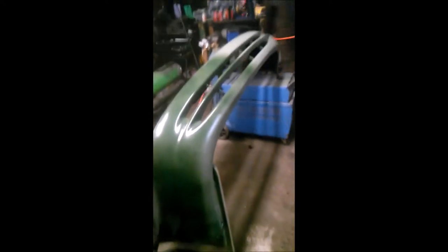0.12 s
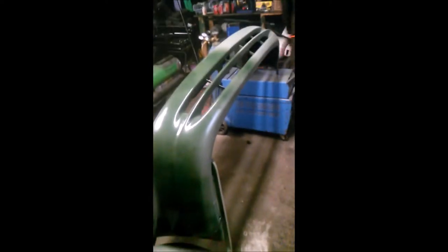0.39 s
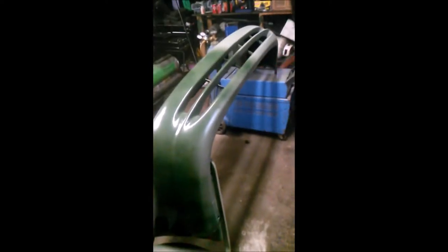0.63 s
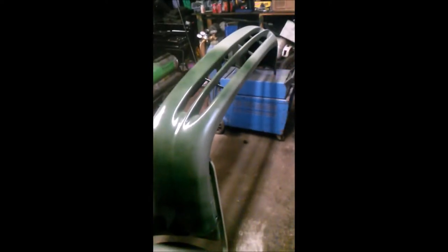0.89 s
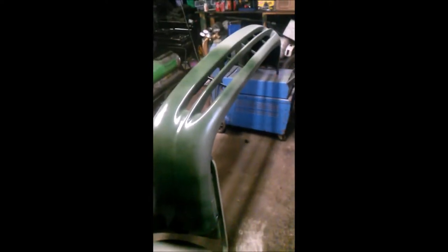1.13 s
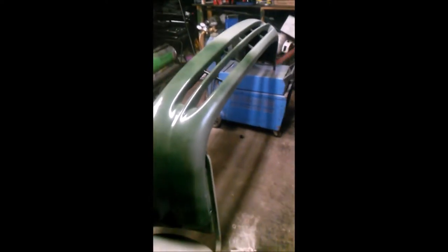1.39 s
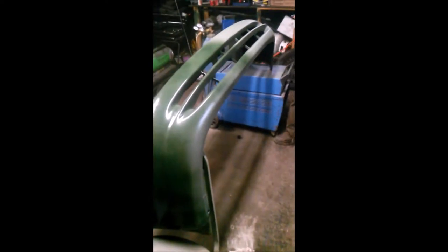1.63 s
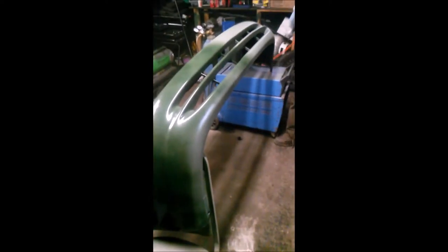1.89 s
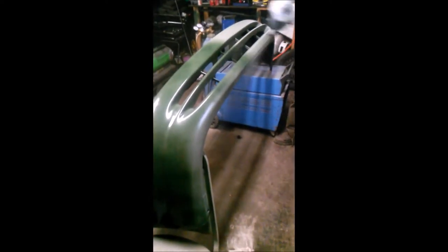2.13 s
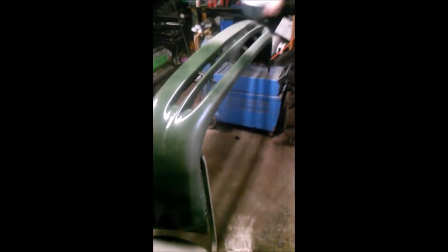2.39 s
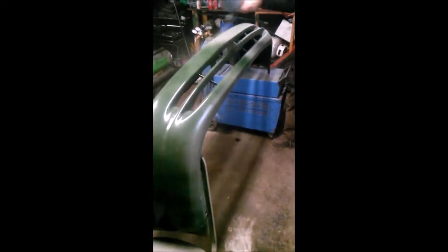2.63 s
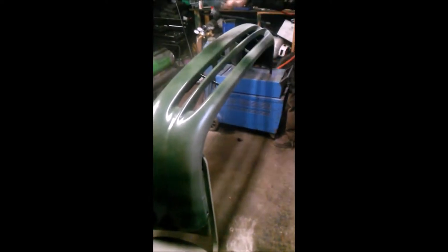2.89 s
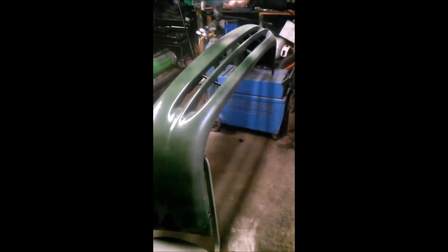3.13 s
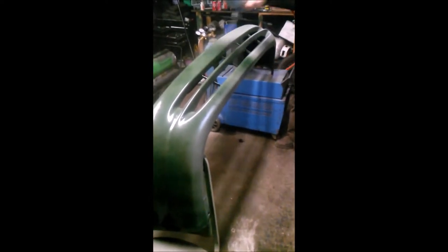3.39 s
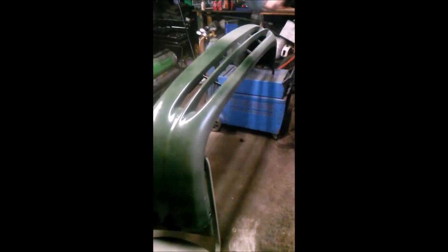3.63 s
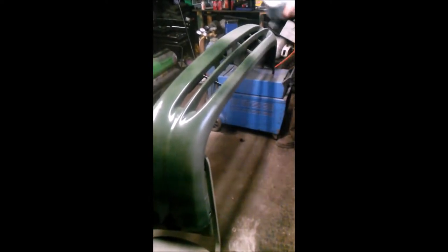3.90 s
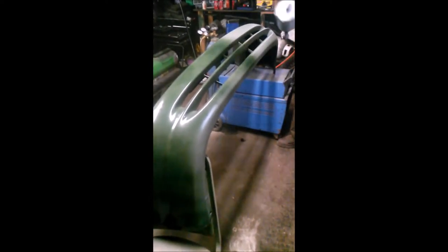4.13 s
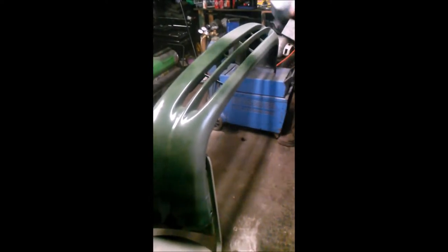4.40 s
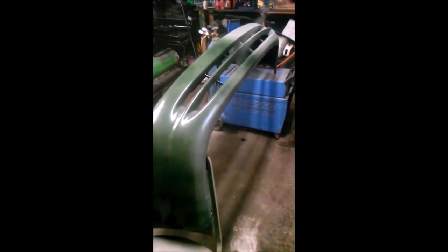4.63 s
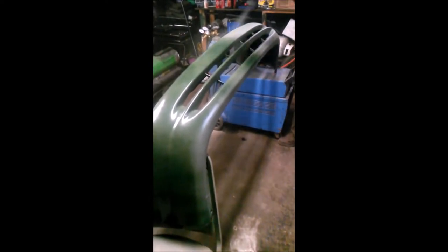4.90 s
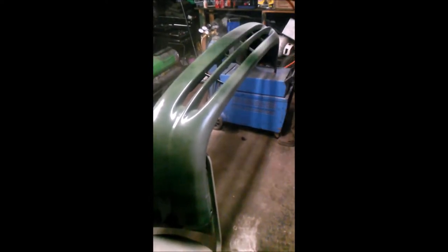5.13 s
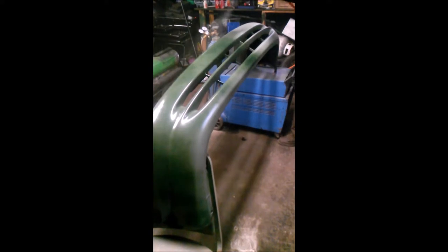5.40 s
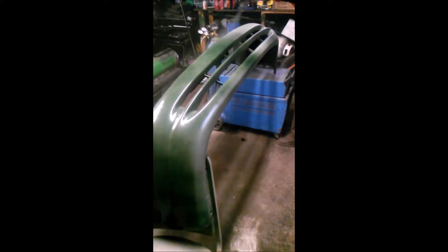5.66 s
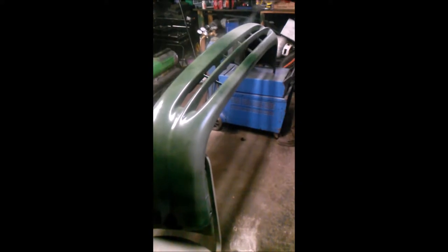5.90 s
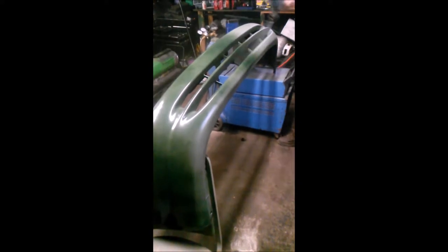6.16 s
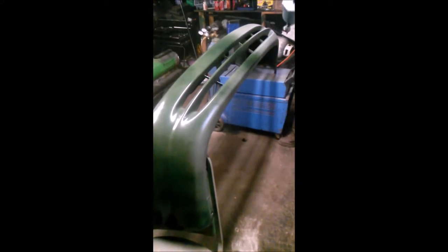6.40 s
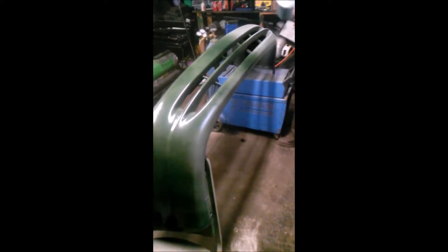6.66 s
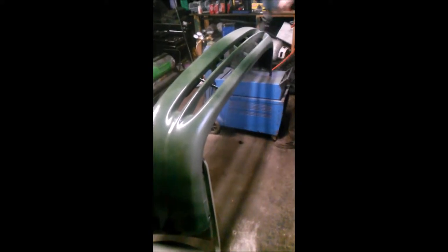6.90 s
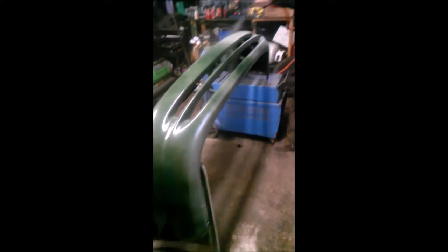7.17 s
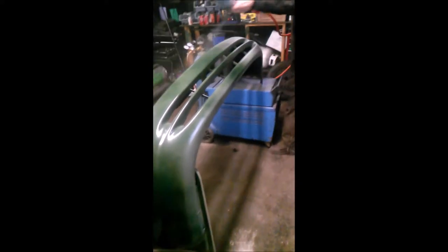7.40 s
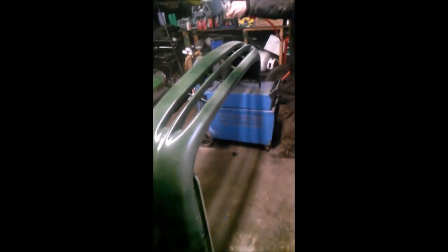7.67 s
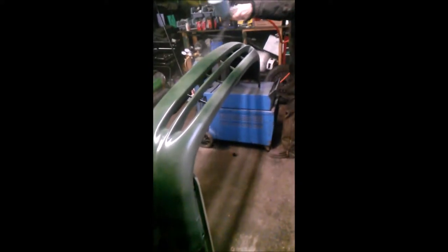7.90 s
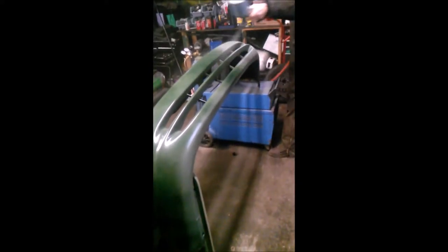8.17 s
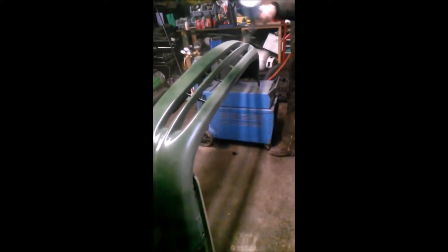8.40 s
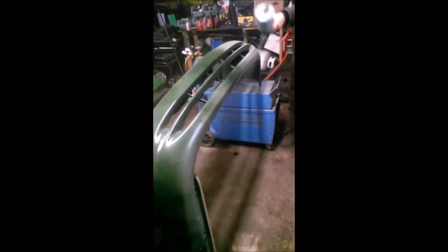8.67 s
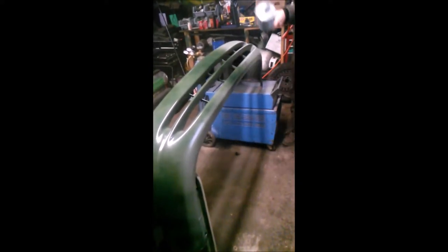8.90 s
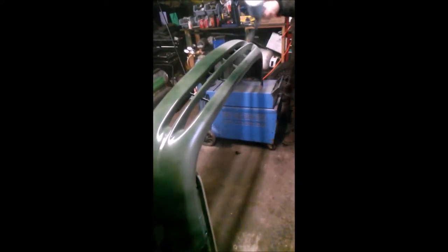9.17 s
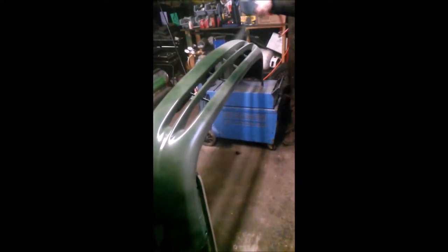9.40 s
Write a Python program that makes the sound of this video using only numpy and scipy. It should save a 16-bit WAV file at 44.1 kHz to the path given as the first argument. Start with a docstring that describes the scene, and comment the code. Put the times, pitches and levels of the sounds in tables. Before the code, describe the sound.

In a home garage, a faint bright seep of air stops after a second while shoes scuff concrete and something knocks dully over low rumble. Then a paint spray gun bursts into loud, harsh hiss, in steady passes of about a second, separated by very short gaps with a low valve thump. Close, small mono microphone, piercing in the treble, overloaded at peaks.

```python
"""Air seeps from a paint gun in a home garage while shoes scuff, something knocks and faint whistles arch.
Then the air-powered gun sprays in steady passes close to a small mono microphone.
Air and scuffs are noise shaped in bands; knocks and the thump of each trigger release are ringing modes.
The microphone port rings near 11 kHz, gain control sinks the room rumble under the jet, and peaks overload.
Now and then the sound thins out briefly."""
import sys
import numpy as np
from scipy import signal
from scipy.fft import rfft, irfft
from scipy.io import wavfile
from scipy.ndimage import uniform_filter1d

SR = 44100
rng = np.random.default_rng(int(sys.argv[2]) if len(sys.argv) > 2 else 0)


def transcribe(signal):
    """Save signal, clipped to [-1, 1], as a 16-bit WAV file at the path in sys.argv[1]."""
    frames = np.atleast_2d(signal).T
    limited = np.clip(frames, -1, 1)
    pcm = np.round(limited * 32767).astype(np.int16)
    wavfile.write(sys.argv[1], SR, pcm)


def boost(x):
    """Linear amplitude factor 10**(x/20) for a level x in decibels (scalar or array-like)."""
    u = np.asarray(x, float) / 20
    return 10 ** u


N = 420713

# All levels are those of the sources, ahead of the microphone's ringing and gain control.
# air seeping past the valve: start t/s, end t/s, level/dB
SEEPS = [(0, 0.973, -42.5), (1.18, 1.19, -53)]
# colour of the seeping air: f/Hz, relative level/dB per Hz
SEEP_COLOUR = [(3000, -17.5), (7000, 5), (8600, -24), (9700, 5), (10500, 2), (11500, -7), (13000, -12),
               (15500, 4.5)]
# colour of the room's own sound: f/Hz, relative level/dB per Hz
ROOM_COLOUR = [(25, 4.5), (36, 3.5), (60, -7.5), (92, -9.5), (170, -13.5), (260, -12), (500, -20),
               (1200, -26.5), (2500, -30), (5000, -39), (8000, -46), (12000, -46.5), (15500, -48)]
# low rumble swells as someone moves about: t/s, peak level/dB
RUMBLES = [(.02, -42), (.2, -37), (.48, -38), (.82, -43), (1.09, -32), (1.3, -42), (1.59, -38), (1.76, -39)]
# shoes on concrete, each scuff swelling and fading: peak t/s, peak level/dB, rough length/s
SCUFFS = [(0.214, -42, 0.19), (0.323, -49, 0.1), (0.466, -40, 0.18), (0.703, -57, 0.12), (.83, -61, .1),
          (.96, -49, 0.15), (1.24, -46.5, 0.11), (1.608, -43, 0.079)]
# colour of the scuffs: f/Hz, relative level/dB per Hz
SCUFF_COLOUR = [(300, 13), (1000, 6), (2500, 11.5), (4000, 3), (6500, 1), (10000, -21), (15000, 2)]
# dull knocks: t/s, nominal level/dB
KNOCKS = [(0.08, -36), (.2, -33.5), (0.806, -34), (1.017, -36), (1.569, -21.5)]
# ringing modes of the knocked thing: f/Hz, relative level/dB, time to fall by 60 dB/s
KNOCK_MODES = [(103, -24, 0.25), (144.4, 4.5, 0.32), (189, 6, 0.26), (258, 5, 0.26), (313, -2, 0.51),
               (374, -4, 0.24), (440, -11, 0.26), (730, -15, .1), (1250, -9, .08)]
# faint whistles that arch up and back down: start t/s, end t/s, lowest f/Hz, level/dB
WHISTLES = [(0.187, 0.313, 1430, -49.5), (0.194, .27, 2130, -48), (0.417, .62, 1117, -53),
            (.44, .58, 2534, -53), (.77, 1.22, 1864, -55)]
# trigger pulled: t/s, nominal settled jet level/dB, level change as the gun swings along the part/dB per s
PULLS = [(1.865, -18.5, -.5), (3.08, -19, 0), (4.23, -18.5, -0.5), (5.347, -19, 0), (6.581, -18, -1.5),
         (7.671, -19, 0), (8.874, -18, -3.5)]
# trigger let go, the valve seats with a thump: t/s, nominal thump level/dB
RELEASES = [(2.92, -24), (4.096, -21.5), (5.175, -22), (6.401, -24.5), (7.528, -23.5), (8.715, -22)]
# colour of the jet before its tilt: f/Hz, relative level/dB per Hz
JET_COLOUR = [(150, -39), (350, -17.5), (490, -5), (650, -9.5), (1000, -5.5), (1700, -6), (2600, 2.5),
              (4000, -1.5), (6300, 1), (8000, -2.5), (10000, -1), (12000, -1.5), (13500, 2), (16000, 1)]
# ringing modes of the gun: f/Hz, relative level/dB, time to fall by 60 dB/s
GUN_MODES = [(70, -1, 0.22), (133, -2.5, 0.22), (210, -0.5, 0.11), (254, 3, 0.097), (324, -2, .1),
             (395, -0.5, 0.245), (473, -10, 0.36)]
# the sound thins out briefly to the port band and a few stray tones: centre t/s, number of frames
THINNINGS = [(.135, 1), (.242, 1), (.284, 1), (.35, 1), (.39, 1), (.541, 1), (.731, 1), (.881, 1),
             (1.052, 1), (1.223, 1), (1.991, 1), (2.312, 1), (2.879, 2), (3.355, 3), (3.933, 1), (4.508, 1),
             (4.573, 1), (4.808, 1), (4.956, 1), (5.318, 1), (5.467, 3), (5.554, 1), (5.811, 1), (6.365, 1),
             (6.452, 1), (6.664, 1), (6.876, 1), (6.962, 1), (7.015, 2), (7.219, 1), (7.464, 2), (7.705, 1),
             (7.779, 3), (7.857, 1), (7.901, 1), (8.114, 1), (8.242, 1), (8.478, 1), (8.755, 1), (8.941, 2),
             (9.009, 1), (9.137, 1), (9.179, 1), (9.33, 1)]

SEEP_DIES_DB_PER_S = 138
SEEP_EDGE_HZ, SEEP_BELOW_EDGE_DB = 9000, -4.5   # the leak sets in steeply above this edge
ROOM_TONE_DB = -38
RUMBLE_DB, RUMBLE_WAVERS_DB, RUMBLE_SWELL_S = -45, 1, 0.075
JOLT_DB, JOLT_AFTER_S = -52, 0.092   # the rumble also swells after each release of the trigger
SHUFFLE_DB = -56   # faint shuffling until the first pass
WHISTLE_EDGE_S, WHISTLE_ARCH_PER_S = 0.03, 0.09   # arch: share of pitch gained per second of length
VALVE_OPENS_S, VALVE_SHUTS_S = 0.0083, 0.014   # time constant of each of two smoothings
# stored pressure makes each pass start louder and brighter, then settle
SURGE_DB, SURGE_S = 1, 0.2
SURGE_TILT_DB_PER_OCT, SETTLED_TILT_DB_PER_OCT = 1.03, 1.04
TREBLE_T60_S, MIDDLE_T60_S, WALL_CUT_HZ = 0.18, 0.34, 2700   # echoes above and below the cut
ECHO_DB, STEP_S = -6.5, 0.15
PORT_HZ, PORT_WIDTH_HZ, PORT_DB = 11168, 884, 19   # level of the ringing added to the plain sound
CUTOFF_HZ = 15750
BRIEF_LEAVES_DB, LONG_LEAVES_DB = -14.5, -24   # what one frame, or a run of them, leaves of the rest
SLOW = 40   # samples between slowly changing values


def at_hz(points, hz):
    """Read a table on a log-frequency axis."""
    table_hz, values = np.array(points).T
    return np.interp(np.log(hz), np.log(table_hz), values)


def rms_one(x):
    """Scale to unit rms, the usual measure of average strength."""
    return x / np.sqrt(np.mean(x ** 2) + 1e-20)


def lag(x, seconds):
    """One-pole smoothing: the output chases the input with the given time constant."""
    r = np.exp(-1 / (max(seconds, 1e-4) * SR))
    return signal.lfilter([1 - r], [1, -r], x + 1e-18)


def drift(rate_hz):
    """Slow chance of rms 1: white noise through two equal one-pole smoothings."""
    r = np.exp(-2 * np.pi * rate_hz * SLOW / SR)
    white = rng.standard_normal(N // SLOW + 2002)
    return rms_one(signal.lfilter([1], [1, -2 * r, r * r], white)[2000:])   # skip the filter's start


def stretched(slow):
    """Fill in the samples between slow values with straight lines."""
    return np.interp(np.arange(N) / SLOW, np.arange(len(slow)), slow)


def swells(rows):
    """Bell-shaped gains from rows of (t/s, peak level/dB, spread/s), added in power."""
    t = np.arange(N // SLOW + 2) * SLOW / SR
    power = sum(boost(2 * db) * np.exp(-((t - s) / spread) ** 2) for s, db, spread in rows)
    return stretched(np.sqrt(power))


def bands(spectrum, patchy_db, low_hz=22):
    """Third-octave bands of noise with their own level and flicker: yields centre and band."""
    edges = 18000 * 2 ** (np.arange(-30, 1) / 3)
    edges = edges[edges > low_hz]
    centres = np.sqrt(edges[1:] * edges[:-1])
    power = boost(2 * at_hz(spectrum, centres)) * np.diff(edges)
    total = np.sqrt(np.sum(power) * 2 / SR)
    white = rng.standard_normal((2, N))   # neighbouring bands take turns, so they differ
    together = drift(3.6)
    for k, hz in enumerate(centres):
        sos = signal.butter(2, edges[k:k + 2], "band", fs=SR, output="sos")
        band = signal.sosfilt(sos, white[k % 2])
        flicker_db = patchy_db * (0.26 * together + drift(7.3))
        yield hz, band * stretched(boost(at_hz(spectrum, hz) + flicker_db)) / total


def struck(hits, modes, spread_db):
    """Each blow sets every mode ringing with a strength of its own."""
    at = [round(s * SR) for s, db in hits]
    hit_db = np.array(hits)[:, 1]
    out = np.zeros(N)
    chance = rng.standard_normal((len(hits), len(modes)))
    for k, (hz, level_db, t60) in enumerate(modes):
        clicks = np.full(N, 1e-18)
        clicks[at] = boost(hit_db + level_db - 11 + spread_db * chance[:, k])
        r, w = boost(-60 / (t60 * SR)), 2 * np.pi * hz / SR
        out += signal.lfilter([0, np.sin(w)], [1, -2 * r * np.cos(w), r * r], clicks)
    return out


def seep():
    """A thin bright leak of air that holds, then dies away."""
    t = np.arange(N) / SR
    leak = np.zeros(N)
    for start, end, db in SEEPS:
        leak += (t >= start) * boost(db - SEEP_DIES_DB_PER_S * np.clip(t - end, 0, 1))
    hiss = sum(band for hz, band in bands(SEEP_COLOUR, patchy_db=0.6, low_hz=2000))
    duller = signal.sosfiltfilt(signal.butter(8, SEEP_EDGE_HZ, fs=SR, output="sos"), hiss)
    return leak * (hiss - duller + boost(SEEP_BELOW_EDGE_DB) * duller)


def room_tone():
    """Steady garage air as banded noise; the lowest bands swell on their own."""
    moves = RUMBLES + [(s + JOLT_AFTER_S, JOLT_DB) for s, db in RELEASES]
    rumble = boost(RUMBLE_DB + RUMBLE_WAVERS_DB * stretched(drift(3.4)))
    rumble = rumble + swells([(s, db, RUMBLE_SWELL_S) for s, db in moves])
    out = np.zeros(N)
    for hz, band in bands(ROOM_COLOUR, patchy_db=1.5):
        out += band * (rumble if hz < 65 else boost(ROOM_TONE_DB))
    return out


def scuffs():
    """Soles drag grit over the floor: noise that swells and fades with each scuff."""
    drag = swells([(s, db, length / 4) for s, db, length in SCUFFS])
    before_first_pass = np.arange(N) < PULLS[0][0] * SR
    drag = drag + boost(SHUFFLE_DB) * before_first_pass
    return drag * sum(band for hz, band in bands(SCUFF_COLOUR, patchy_db=0.8, low_hz=400))


def knocks():
    """A low wooden ring and, with it, a short rattle of mid-range noise."""
    burst = np.zeros(N)
    for s, db in KNOCKS:
        burst[round(s * SR)] = boost(db - 19)
    rattle = signal.lfilter([1], [1, -boost(-60 / (0.33 * SR))], burst + 1e-18)   # falls 60 dB in 0.33 s
    sos = signal.butter(1, [1800, 6000], "band", fs=SR, output="sos")
    grit = signal.sosfilt(sos, rng.standard_normal(N))
    return struck(KNOCKS, KNOCK_MODES, spread_db=2.5) + rattle * rms_one(grit)


def whistle():
    """Faint sine tones whose pitch arches while level and pitch waver by chance."""
    t, out = np.arange(N) / SR, np.zeros(N)
    flutter_db, waver_hz = 2.1 * stretched(drift(16)), 12 * stretched(drift(36))
    for start, end, low_hz, db in WHISTLES:
        length = end - start
        arch = np.sin(np.pi * np.clip((t - start) / length, 0, 1))
        hz = low_hz * (1 + WHISTLE_ARCH_PER_S * length * arch)
        edge = np.clip(np.minimum(t - start, end - t) / WHISTLE_EDGE_S, 0, 1)
        phase = 2 * np.pi * np.cumsum(hz + waver_hz) / SR
        out += edge * boost(db + flutter_db) * np.sin(phase)
    return out


def garage(x):
    """The gun moves, so every stretch of sound meets another pattern of reflections."""
    hop, t = round(STEP_S * SR), np.arange(round(0.3 * SR)) / SR
    fade = np.sin(np.pi * np.arange(2 * hop) / (2 * hop)) ** 2
    out = np.zeros(N + 4 * hop + len(t))
    padded = np.pad(x, (hop, 2 * hop))
    low = signal.butter(1, WALL_CUT_HZ, fs=SR, output="sos")
    for i in range(0, N + hop, hop):
        white = rng.standard_normal(len(t))
        dull = signal.sosfilt(low, white)
        echoes = (white - dull) * boost(-60 * t / TREBLE_T60_S) + dull * boost(-60 * t / MIDDLE_T60_S)
        echoes = boost(ECHO_DB) * rms_one(echoes * (t > 0.003)) / np.sqrt(len(t))
        echoes[0] = 1   # the direct sound
        heard = signal.fftconvolve(padded[i:i + 2 * hop] * fade, echoes)
        out[i:i + len(heard)] += heard
    return out[hop:hop + N]


def jet():
    """Turbulent air as banded noise: the flow builds fast and closes slower."""
    opened, since_pull = np.zeros(N), np.zeros(N)
    ends = [s + 0.0017 for s, db in RELEASES] + [N / SR]
    for (start, jet_db, change_db), end in zip(PULLS, ends):
        first = round(start * SR)
        since_pull[first:] = np.arange(N - first) / SR
        held = slice(first, round(end * SR))
        opened[held] = boost(jet_db + change_db * since_pull[held])
    opening = lag(lag(opened, VALVE_OPENS_S), VALVE_OPENS_S)
    closing = lag(lag(opened, VALVE_SHUTS_S), VALVE_SHUTS_S) * (opened == 0)
    flow = np.maximum(opening, closing)
    surge = np.exp(-since_pull / SURGE_S)
    tilt_db = SETTLED_TILT_DB_PER_OCT + SURGE_TILT_DB_PER_OCT * surge
    noise = np.zeros(N)
    for hz, band in bands(JET_COLOUR, patchy_db=0.7, low_hz=100):
        noise += band * boost(tilt_db * np.log2(hz / 11000))   # the tilt pivots at 11 kHz
    return garage(flow * boost(SURGE_DB * surge) * noise)


def thumps():
    """The valve seats just after each release and sets the gun's body ringing."""
    return struck([(s + 0.004, db) for s, db in RELEASES], GUN_MODES, spread_db=2)


def scene():
    """All sources reach one microphone; both channels are the same."""
    mono = seep() + room_tone() + scuffs() + knocks() + whistle() + jet() + thumps()
    return np.array([mono, mono])


def port_resonance(x):
    """Air in the microphone port resonates, adding a narrow ringing band to the sound."""
    r, w = np.exp(-np.pi * PORT_WIDTH_HZ / SR), 2 * np.pi * PORT_HZ / SR
    ringing = signal.lfilter(np.array([1, 0, -1]) * (1 - r * r) / 2, [1, -2 * r * np.cos(w), r * r], x)
    return x + boost(PORT_DB) * ringing


def gain_control(x):
    """Turns everything down as the smoothed loudness rises past a threshold."""
    level_db = 10 * np.log10(lag(x ** 2, 0.0099) + 1e-12)
    over_db = np.maximum(level_db + 21.5, 0)
    return x * boost(6 - 0.3 * over_db)


def thinned(x, stray=2.6, easier_per_khz=0.08, kept_db=-9, lift_db=4):
    """In short overlapping frames, weaken all but the loudest region and lift outstanding partials."""
    hop = round(0.0213 * SR)
    fade = np.sin(np.pi * np.arange(2 * hop) / (2 * hop))
    khz = np.fft.rfftfreq(2 * hop, 1000 / SR)
    out = x.copy()
    for s, frames in THINNINGS:
        left_db = LONG_LEAVES_DB if frames > 1 else BRIEF_LEAVES_DB
        first = round(s * SR) - hop * (frames + 1) // 2
        for i in first + hop * np.arange(frames):
            partials = rfft(x[i:i + 2 * hop] * fade)
            local = np.sqrt(uniform_filter1d(abs(partials) ** 2, size=25))
            quiet = local < boost(kept_db) * local[khz > 7].max()
            outstanding = abs(partials) > (stray - easier_per_khz * khz) * local   # easier in the treble
            near_one = uniform_filter1d(1.0 * outstanding, size=3) > 0
            gain = np.where(near_one, boost(lift_db), boost(left_db))
            out[i:i + 2 * hop] += fade * irfft(partials * quiet * (gain - 1), 2 * hop)
    return out


def band_limit(x):
    """A steep low-pass at the top of the band."""
    return signal.sosfilt(signal.butter(12, 16340, fs=SR, output="sos"), x)


def record(dry):
    """Port resonance, gain control that follows loudness, overload, band limit and brief thinning."""
    x = gain_control(port_resonance(dry[0]))
    overloaded = np.clip(x, -1.05, 1.05)
    limited = signal.sosfilt(signal.ellip(14, 0.3, 65, CUTOFF_HZ, fs=SR, output="sos"), overloaded)
    mono = thinned(limited)
    mix = np.clip([mono, mono], -1, 1)
    return band_limit(mix)


dry = scene()
out = record(dry)
transcribe(out)
```